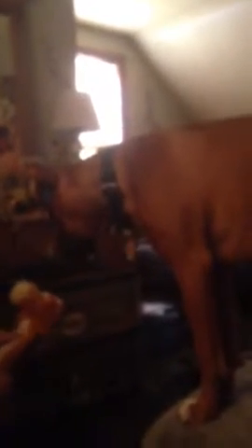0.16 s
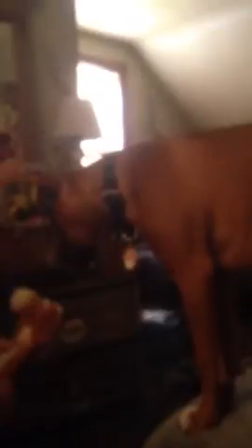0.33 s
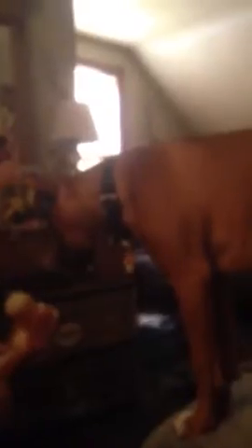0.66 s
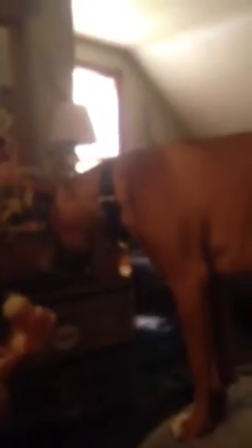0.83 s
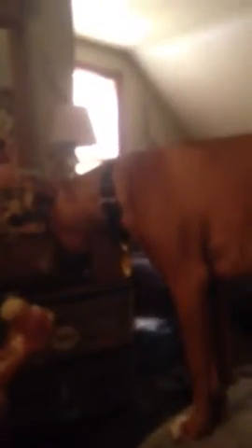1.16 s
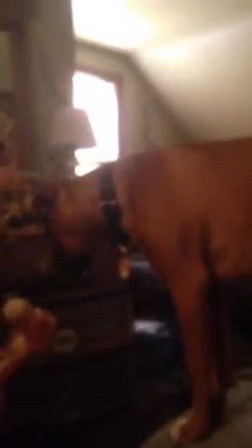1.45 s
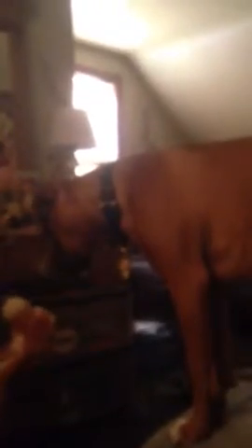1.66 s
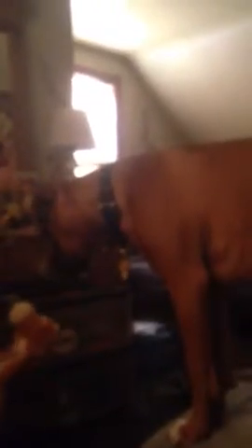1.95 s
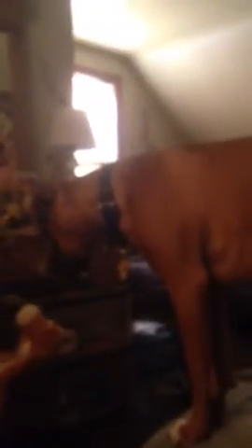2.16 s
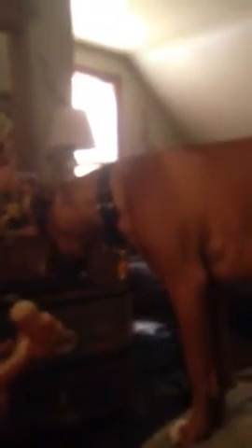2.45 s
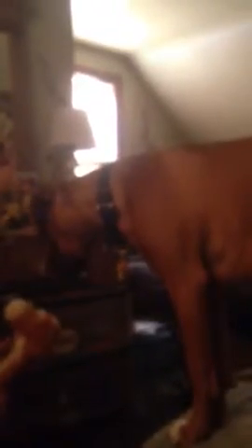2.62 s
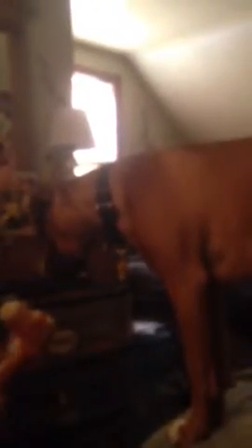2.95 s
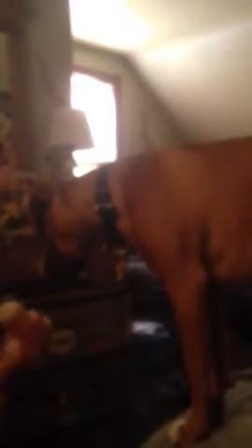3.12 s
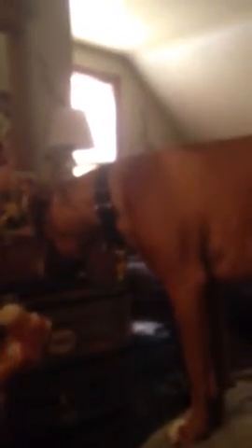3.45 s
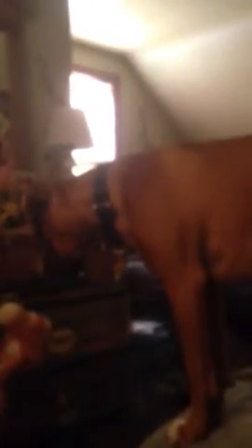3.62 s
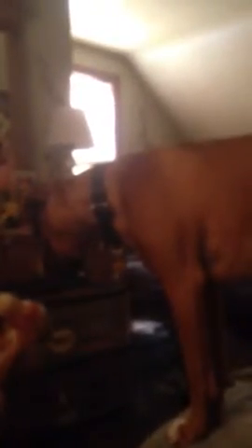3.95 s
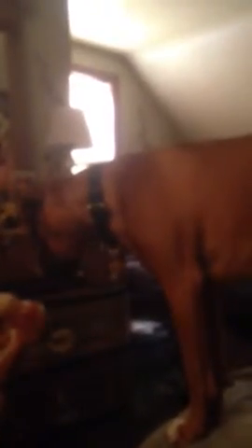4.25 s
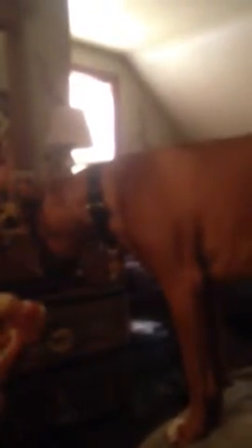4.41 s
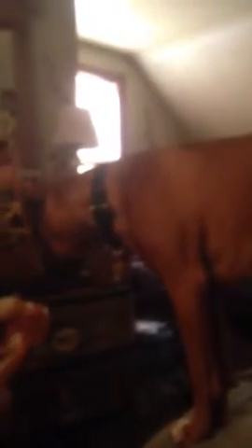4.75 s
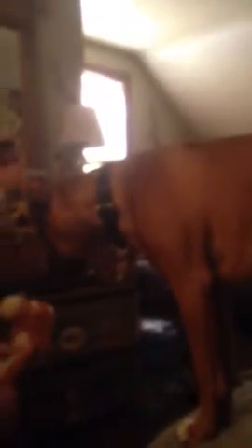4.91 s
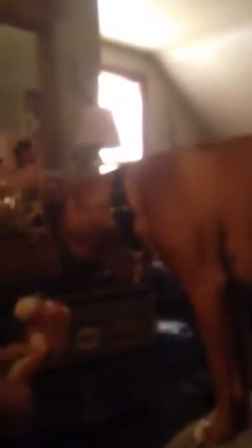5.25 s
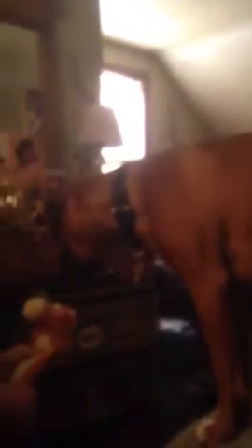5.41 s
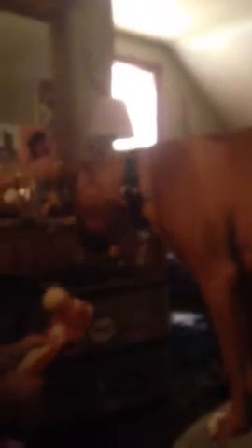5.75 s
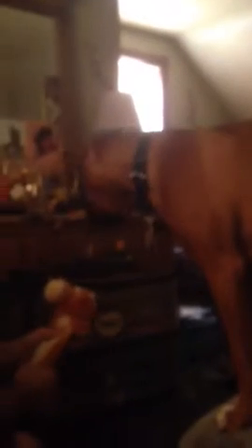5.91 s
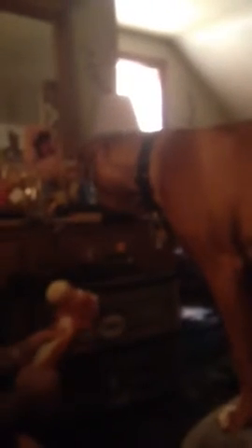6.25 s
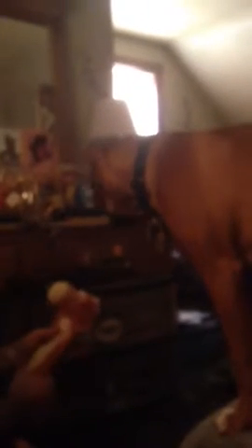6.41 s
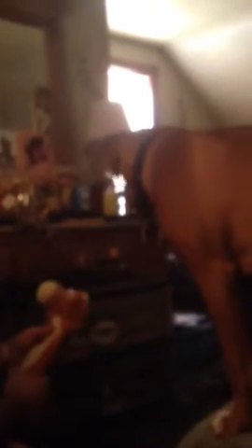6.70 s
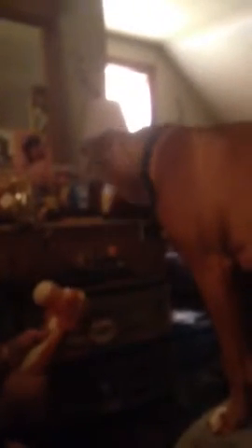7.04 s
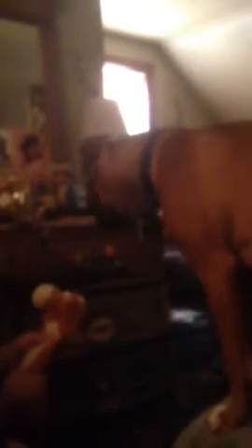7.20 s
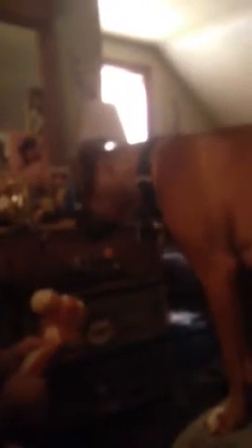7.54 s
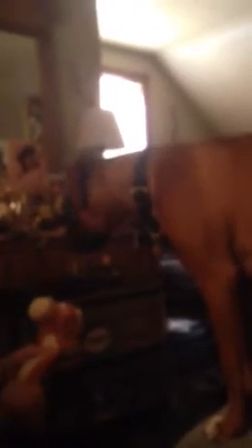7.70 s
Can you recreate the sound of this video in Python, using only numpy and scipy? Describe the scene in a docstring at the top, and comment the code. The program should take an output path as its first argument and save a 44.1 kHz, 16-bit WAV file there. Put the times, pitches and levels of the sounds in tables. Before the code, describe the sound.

A rubber squeaky toy is worked by hand close to the microphone in a small furnished room with near reflections and a short tail. At about 0.1 s a raspy yelp leaps into a piercing squeal that holds high, then slides down and dies by 0.9. From 1.0 to 2.3 come fussy little squeezes: short squawks, soft chirps, cracking whistles and wheezy refills. A thin, slightly sagging whine with a low nasal buzz lasts until about 2.9. A second, shorter squeal arches at 3.1 to 3.6, with a refill whine and buzz from 3.8 to 4.5. A third squeal runs 4.8 to 5.5, followed by buzzing, chirps and quick squawks until 6.4, then a longer whine to 6.95. The fourth squeal rises at 7.2 and slides away by 7.8. Low appliance hum and faint hush fill the gaps, swelling slightly.

```python
"""A small furnished room: a rubber toy with three reeds is squeezed and let go close to the microphone.
Each reed is a pulse train of harmonics coloured by its pipe: the high one squeals in arches, the middle
one drones near 1 kHz as the toy refills, the low one buzzes and leaps through registers when pressed.
Near echoes and a short tail make the room; an appliance hums in a hush; gain control lifts the pauses."""
import sys
import numpy as np
from scipy import signal
from scipy.fft import rfft, irfft
from scipy.io import wavfile
from scipy.ndimage import uniform_filter1d

SR = 44100
rng = np.random.default_rng(int(sys.argv[2]) if len(sys.argv) > 2 else 0)


def store_pcm(level_fs):
    """Save levels as 16-bit WAV."""
    pcm = np.round(np.clip(level_fs, -1, 1) * 32767).astype(np.int16)
    wavfile.write(sys.argv[1], SR, np.atleast_2d(pcm).T)


N = 347067

GENTLE_PRESSES = [(1.55, 1.574, 1.615, 1.66, 1296, -16.5), (1.785, 1.816, 1.842, 1.897, 1160, -19),
                  (2.05, None, 2.088, 2.135, 557.6, -24)]
# colour of the low reed's pipe, air drawn in: freq_hz, gain_db
LOW_INWARD_PIPE = [(450, -24), (1000, -18), (2000, -12.5), (2500, -15), (3050, -11.5), (4050, -20),
                   (5000, 1.5), (6600, -3.5), (7300, -10.5), (8300, -22.5), (11000, -17), (15000, -24.5)]
# low register of the low reed, time of a register leap, level at the start of a press
LOW_ENTRY_HZ, LOW_EXIT_HZ, LEAP_S, PRESS_RISE_DB = 464.3, 730.6, .006, -10.5


def gain_of(db):
    """Decibels to an amplitude factor."""
    return 10 ** (np.asarray(db) / 20)


def evened(x):
    """Scales to rms 1."""
    return x / np.sqrt(np.mean(x ** 2) + 1e-20)


def read(points, hz):
    """Interpolates a table on a log-frequency axis."""
    f, value = np.transpose(points)
    return np.interp(np.log(hz + 1), np.log(f + 1), value)


def wobble(count, seconds):
    """Noise of rms 1, smoothed twice by a moving mean of this length."""
    size = max(round(seconds * SR), 2)
    once = uniform_filter1d(rng.standard_normal(count), size=size)
    return evened(uniform_filter1d(once, size=size))


def reed(notes, pipe, waver, dull_db, smooth_samples=120):
    """Pulse trains as sums of harmonics, each weighted and delayed by the pipe; note rows: s, Hz, dB."""
    top_hz = SR / 2.6
    grid_hz = np.fft.rfftfreq(1024, 1 / SR)
    log_gain = np.log(gain_of(read(pipe, grid_hz)))
    mirrored = np.r_[log_gain, log_gain[-2:0:-1]]
    phase_rad = -signal.hilbert(mirrored).imag[:len(grid_hz)]  # minimum phase: pipe rings after each pulse
    out = np.zeros(N)
    for rows in notes:
        s, hz, level_db = np.transpose(rows)
        at = np.arange(round(s[0] * SR), round(s[-1] * SR))
        hz, level_db = np.interp(at / SR, s, hz), np.interp(at / SR, s, level_db)
        hz = uniform_filter1d(hz, size=smooth_samples, mode="nearest")  # the reed rounds off changes
        glide_per_s = np.minimum(abs(np.gradient(np.log(hz))) * SR, 30)
        jerks = .0012 * glide_per_s * wobble(len(at), .004)  # slides are uneven
        hz = hz * (1 + waver * wobble(len(at), 0.0021) + jerks)

        k = np.arange(1, top_hz / hz.min())[:, None]
        harmonic_hz = k * hz
        # a fast reed hardly shuts: overtones lose dull_db an octave at 3 kHz pitch, less when lower
        fading_db = dull_db * np.log2(k) * hz / 3000
        weight = gain_of(read(pipe, harmonic_hz) - fading_db) * (harmonic_hz < top_hz)
        phase = 2 * np.pi * k * np.cumsum(hz) / SR + np.interp(harmonic_hz, grid_hz, phase_rad)
        tone = (weight * np.cos(phase)).sum(0)
        tone /= np.sqrt((weight ** 2).sum(0) / 2)
        ramp = np.minimum(at - at[0], (at[-1] - at) / 4) / (.001 * SR)  # 1 ms in, 4 ms out
        out[at] += gain_of(level_db) * np.minimum(1, ramp) * tone
    return out


def arch(t, crest_s, start_hz, crest_hz, end_hz):
    """Pitch that bends up to a crest and eases down again."""
    up = np.clip((crest_s - t) / (crest_s - t[0]), 0, 1)
    down = np.clip((t - crest_s) / (t[-1] - crest_s), 0, 1)
    return crest_hz - (crest_hz - start_hz) * up ** 2 - (crest_hz - end_hz) * down ** 1.6


def droop(t, seconds):
    """Pitch lost, in Hz, as the air gives out at the end of a note."""
    droop_hz_per_s = 2100
    return droop_hz_per_s * seconds * np.maximum(1 - (t[-1] - t) / seconds, 0) ** 2


def squeal(rows, tail):
    """The arch of the hand, then a tail that drops fast, sags slowly, droops and fades ever faster."""
    slip_s, droop_s, bend = .005, .03, 1.4
    from_hz, knee_hz, rest_hz = 1830, 1222, 1027
    tail_db, fade_db = -18.5, -22
    knee_s, end_s = tail
    t = np.linspace(0, end_s, num=60)
    hz = np.interp(t, [knee_s, end_s], [knee_hz, rest_hz]) - droop(t, droop_s)
    hz = hz + (from_hz - knee_hz) * np.maximum(1 - t / knee_s, 0) ** bend
    level_db = tail_db + fade_db * (t / end_s) ** 1.5
    return np.r_[rows, np.c_[rows[-1][0] + slip_s + t, hz, level_db]]


def squeals():
    """High reed: pitch follows the pressure of the hand until it slips into its dying tail."""
    # one list a squeal: time_s, pitch_hz, level_db
    hand_arches = [
        [(0.115, 823, -19), (0.14, 2500, -16), (0.18, 4470, -20), (0.23, 4830, -15), (0.26, 4826, -40),
         (0.3, 4828, -19.5), (0.343, 4750, -30), (0.348, 4730, -16), (0.39, 4583, -20), (0.43, 4502, -18.5),
         (0.52, 4445, -25.5), (0.563, 3940, -24), (0.566, 3660, -22), (0.603, 3420, -21), (0.64, 3287, -21),
         (0.7, 2623, -19), (0.745, 2054, -20)],
        [(3.09, 1145, -21), (3.1, 1560, -16.5), (3.12, 2410, -15.5), (3.163, 3500, -18), (3.187, 3780, -20.5),
         (3.192, 4140, -23.5), (3.225, 4460, -26), (3.265, 4040, -25), (3.27, 3700, -21), (3.3, 3154, -20),
         (3.35, 2482, -18.5), (3.404, 2335, -21), (3.408, 2191, -17), (3.445, 2116, -22)],
        [(4.83, 901, -26), (4.87, 1407, -18), (4.898, 1940, -15.5), (4.902, 2140, -16), (4.925, 2790, -18.5),
         (4.95, 3235, -21), (5.0, 3750, -23), (5.012, 4070, -21.5), (5.025, 3627, -23), (5.13, 3510, -23),
         (5.16, 3410, -23.5), (5.2, 3040, -21), (5.23, 2550, -20.5), (5.27, 2275, -19.5), (5.292, 1920, -21)],
        [(7.195, 826, -29), (7.24, 1459, -16.5), (7.26, 1950, -17.5), (7.29, 3280, -18), (7.305, 3560, -19),
         (7.335, 3810, -25), (7.34, 4100, -25), (7.365, 4195, -22), (7.4, 4236, -24), (7.45, 4010, -24.5),
         (7.455, 3675, -25), (7.5, 3430, -20.5), (7.53, 3160, -20.5), (7.575, 2460, -19.5),
         (7.608, 2090, -18.5)],
    ]
    # dying tail of each squeal: level_off_s, end_s (both from the tail's start)
    dying_tails = [(.1, .18), (.078, 0.2), (.075, 0.18), (.085, 0.2)]
    # colour of the pipe: freq_hz, gain_db
    squeal_pipe = [(800, -14), (1500, -10), (2500, -9.5), (4000, -3), (5500, 2.5), (7000, 0.5), (9000, -1),
                   (10800, -13.5), (12500, -4.5), (15000, -14.5)]
    return reed(map(squeal, hand_arches, dying_tails), squeal_pipe, waver=0.0016, dull_db=5.5)


def chirp(start_s, crest_s, end_s, crest_hz, level_db):
    """One arch with a soft start that fades at its end."""
    start_hz, end_hz, fade_db = 1098, 1020, -10
    t = np.linspace(start_s, end_s, num=40)
    fade = ((t - start_s) / (end_s - start_s)) ** 6 + 0.31 * np.exp((start_s - t) / 0.0069)
    return np.c_[t, arch(t, crest_s, start_hz, crest_hz, end_hz), level_db + fade_db * fade]


def chirps():
    """High reed: short pitch arches as the grip shifts."""
    # start_s, crest_s, end_s, crest_hz, level_db
    chirp_rows = [(1.204, 1.237, 1.285, 1160, -24.5), (1.482, 1.516, 1.57, 1212, -24.5),
                  (2.084, 2.137, 2.21, 1514, -21.5), (5.857, 5.905, 5.99, 1515, -21),
                  (6.172, 6.206, 6.285, 1494, -20.5)]
    # colour of the pipe: freq_hz, gain_db
    chirp_pipe = [(1000, -12), (2400, -11), (3500, -7.5), (4600, -4), (6000, -2.5), (8000, -3),
                  (10500, -12.5), (15000, -15.5)]
    notes = [chirp(*row) for row in chirp_rows]
    return reed(notes, chirp_pipe, waver=.001, dull_db=1.5, smooth_samples=500)


def drone(start_s, crest_s, end_s, crest_hz, sag_hz_per_s, droop_s, crest_db):
    """Rises to a crest, settles, sags as the toy fills and droops at the end; level follows pitch."""
    start_hz, settle_hz, settle_s, db_per_hz = 979, 20, .1, 0.09
    round_s = .02  # the sag sets in gradually
    t = np.arange(start_s, end_s, .002)
    after = np.maximum(t - crest_s, 0)
    hz = arch(t, crest_s, start_hz, crest_hz, crest_hz)
    hz = hz - settle_hz * (1 - np.exp(-(after / settle_s) ** 2))
    hz = hz - sag_hz_per_s * (after - round_s * (1 - np.exp(-after / round_s)))
    hz = hz - droop(t, droop_s)
    return np.c_[t, hz, crest_db + db_per_hz * (hz - crest_hz)]


def drones():
    """Middle reed, driven by air drawn back in."""
    # start_s, crest_s, end_s, crest_hz, sag_hz_per_s, droop_s, crest_db
    drone_rows = [(0.962, 1.032, 1.19, 1088, 512, 0.041, -26),
                  (1.321, 1.373, 1.455, 1024, 447, 0.024, -28.5),
                  (1.604, 1.638, 1.785, 1008, 420, 0.047, -31),
                  (1.937, 1.973, 2.052, 1002, 200, 0.033, -33), (2.248, 2.297, 2.89, 1009, 150.3, .03, -31),
                  (3.782, 3.871, 4.54, 1033, 171, .03, -28), (5.545, 5.626, 5.845, 1064, 327, 0.035, -26.5),
                  (6.016, 6.05, 6.147, 1029, 350, .03, -30.5),
                  (6.321, 6.359, 6.95, 1029, 159.4, 0.039, -30)]
    # colour of the pipe: freq_hz, gain_db
    drone_pipe = [(800, -11), (1900, -5), (3000, -13), (4000, -10), (6500, -17), (7300, -4), (8300, -1.5),
                  (9300, -1.5), (10200, -6.5), (11200, -5), (12300, -11), (15000, -20.5)]
    notes = [drone(*row) for row in drone_rows]
    return reed(notes, drone_pipe, waver=0.00037, dull_db=0.5, smooth_samples=300)


def hard_press(start_s, leap_s, second_leap_s, end_s, top_hz, level_db):
    """Low, middle and high register in turn; level dips in each leap; a long top steps down a little."""
    low_halfway_hz = 560  # the low climb starts slowly
    middle_entry_hz, middle_exit_hz, high_entry_hz = 1099, 1352, 2405
    dip_db, top_db, fade_db = -3, -6.5, -12
    climb_s, hold_s, step_hz = .013, .032, 211
    high_s = second_leap_s + LEAP_S
    top_s = min(high_s + climb_s, end_s - .001)
    step_s = top_s + hold_s
    rows = [(start_s, LOW_ENTRY_HZ, level_db + PRESS_RISE_DB),
            ((start_s + leap_s) / 2, low_halfway_hz, level_db + dip_db),
            (leap_s, LOW_EXIT_HZ, level_db),
            (leap_s + LEAP_S, middle_entry_hz, level_db + dip_db),
            (second_leap_s, middle_exit_hz, level_db),
            (high_s, high_entry_hz, level_db + dip_db / 2),
            (top_s, top_hz, level_db + top_db)]
    if end_s < step_s + LEAP_S:
        return rows + [(end_s, top_hz, level_db + fade_db)]
    return rows + [(step_s, top_hz - step_hz / 4, level_db + fade_db),
                   (step_s + LEAP_S, top_hz - step_hz, level_db + top_db),
                   (end_s, top_hz - step_hz, level_db + fade_db)]


def gentle_press(start_s, leap_s, crest_s, end_s, top_hz, level_db):
    """A climb through the low register, if it leaps, and one flat-topped arch."""
    rise_share, fall_share, flatness = .17, .24, 2.2  # shares of pitch below the top at start and end
    t = np.linspace(leap_s + LEAP_S if leap_s else start_s, end_s, num=30)
    rising = t < crest_s
    away = np.where(rising, (crest_s - t) / (crest_s - t[0]), (t - crest_s) / (end_s - crest_s))
    hz = top_hz * (1 - np.where(rising, rise_share, fall_share) * away ** flatness)
    rise_db = 0 if leap_s else PRESS_RISE_DB * rising * away
    bend = np.c_[t, hz, level_db + rise_db + 0 * t]
    if not leap_s:
        return bend
    climb = [(start_s, LOW_ENTRY_HZ, level_db + PRESS_RISE_DB), (leap_s, LOW_EXIT_HZ, level_db)]
    return np.r_[climb, bend]


def presses():
    """Low reed pressed: climbs through a register and leaps to the next."""
    # start_s, leap_to_middle_s, leap_to_high_s, end_s, top_hz, level_db
    hard_rows = [(0.091, 0.109, 0.12, 0.14, 2960, -15.5), (1.321, 1.334, 1.361, 1.432, 2640, -15),
                 (3.068, 3.08, 3.095, 3.114, 3030, -15), (4.804, 4.828, 4.842, 4.868, 2750, -14),
                 (5.916, 5.93, 5.94, 5.97, 3024, -16.5), (6.296, 6.318, 6.339, 6.415, 2615, -15),
                 (7.159, 7.199, 7.213, 7.229, 2530, -13.5)]
    # colour of the pipe, air pushed out: freq_hz, gain_db
    outward_pipe = [(450, -24), (1200, -15), (2400, -7.5), (3700, -5.5), (5100, 1), (6300, -9.5),
                    (9000, -15.5), (15000, -15.5)]
    notes = [hard_press(*row) for row in hard_rows] + [gentle_press(*row) for row in GENTLE_PRESSES]
    return reed(notes, outward_pipe, waver=0.0058, dull_db=6)


def cracks():
    """Low reed falls through its registers: whistles cracking on drawn-in air, slips after gentle presses."""
    # whistles: start_s, crack_s, slowness (factor), whistle_hz, level_db
    whistle_rows = [(1.008, 1.034, 1.05, 3050, -26.5), (1.406, 1.442, 1.05, 2943, -28),
                    (3.818, 3.84, 1.07, 2960, -24), (5.541, 5.568, 1.25, 3020, -27.5),
                    (6.121, 6.146, 1.05, 2905, -28), (6.398, 6.42, 1.13, 2880, -27.5)]
    # path of a crack: delay_s (times slowness), pitch_hz, level_db (re whistle)
    crack_path = [(.003, 2347, 5.5), (.01, 1502, -2), (.016, 620, 7.5), (.03, 514.7, 4)]
    # path of a slip: delay_s (after the press), pitch_hz, level_db (re press)
    slip_path = [(0, 903, -12), (.01, 691, -4), (.04, 525, -10)]
    sag_hz, rise_db = 180, -7.5  # a whistle starts sharper and softer
    notes = []
    for start_s, crack_s, slowness, hz, db in whistle_rows:
        whistle = [(start_s, hz + sag_hz, db + rise_db), (crack_s, hz, db)]
        notes.append(whistle + [(crack_s + slowness * d, f, db + more_db) for d, f, more_db in crack_path])
    for _, leap_s, _, end_s, _, db in GENTLE_PRESSES:
        if leap_s:
            notes.append([(end_s + d, f, db + more_db) for d, f, more_db in slip_path])
    return reed(notes, LOW_INWARD_PIPE, waver=0.004, dull_db=9.5)


def buzz(rows, level_db):
    """More flow, higher and louder: level follows pitch."""
    base_hz, db_per_octave = 497.5, 29.5
    return [(s, hz, level_db + db_per_octave * np.log2(hz / base_hz)) for s, hz in rows]


def buzzes():
    """Low reed buzzing on air drawn in; pitch follows the flow."""
    # one list a buzz: time_s, pitch_hz
    buzz_rows = [
        [(1.08, 502), (1.12, 525), (1.145, 505.7), (1.2, 515), (1.23, 492.7), (1.31, 490)],
        [(1.475, 480), (1.51, 548), (1.55, 508)],
        [(1.7, 538), (1.745, 569), (1.765, 544), (1.78, 454)],
        [(1.96, 519), (2.0, 609), (2.04, 468)],
        [(2.17, 519), (2.22, 603.6), (2.25, 565), (2.3, 527), (2.325, 499), (2.35, 502), (2.41, 516.5),
         (2.5, 507), (2.6, 506), (2.64, 512.6), (2.68, 497.8), (2.84, 501.2), (2.87, 524.6), (2.92, 455)],
        [(3.89, 490), (3.95, 523.3), (4.05, 534.7), (4.12, 508), (4.18, 495.6), (4.22, 504.5), (4.26, 457)],
        [(5.625, 483.5), (5.67, 530.6), (5.705, 511.3), (5.75, 505), (5.825, 516), (5.85, 504), (5.88, 470)],
        [(6.18, 467), (6.24, 529), (6.29, 464)],
        [(6.47, 476), (6.5, 540), (6.56, 533), (6.6, 497.5), (6.7, 495.5), (6.78, 500.5), (6.82, 467)],
    ]
    # one value a buzz: level_db (at base_hz)
    buzz_levels = [-32, -32, -32.5, -34, -33.5, -32.5, -31.5, -31, -33]
    notes = map(buzz, buzz_rows, buzz_levels)
    return reed(notes, LOW_INWARD_PIPE, waver=0.00064, dull_db=10.0, smooth_samples=800)


def room(x, wet_db):
    """A few near reflections, then sparse taps of random sign, each band dying at its own speed."""
    # decay: freq_hz, t60_s
    decay_times = [(500, 0.26), (1500, 0.17), (4000, 0.15), (8000, 0.16), (15000, 0.18)]
    # near surfaces: delay_s, level_db
    near_echoes = [(.0012, -11.5), (.0031, -13.5), (.0057, -8), (.0094, -23), (0.0149, -16.5),
                   (.021, -14.5)]
    taps = np.zeros(SR // 2)
    at = np.arange(200, SR // 2 - 20, 20)
    taps[at + rng.integers(0, 20, len(at))] = rng.choice([-1., 1.], len(at))
    hz, t, bands = signal.stft(taps, SR, nperseg=256)
    decay_db = -60 * t / read(decay_times, hz)[:, None]
    tail = signal.istft(bands * gain_of(decay_db), SR, nperseg=256)[1]
    tail = gain_of(wet_db) * tail / np.linalg.norm(tail)
    signs = rng.choice([-1., 1.], len(near_echoes))
    for (delay_s, db), sign in zip(near_echoes, signs):
        tail[round(delay_s * SR)] += sign * gain_of(db)
    return signal.fftconvolve(x, tail)[:N]


def background():
    """Appliance hum as sines wavering in level and phase, over the room's hush of shaped noise."""
    # hum lines: freq_hz, level_db (rms)
    hum_lines = [(59.2, -56), (84, -68.5), (120, -82.5), (177.6, -56.5), (404, -76)]
    # spectrum of the hush: freq_hz, density_db (relative)
    hush_spectrum = [(26, -46), (45, -15.5), (190, 0), (296, -14), (416, -0.5), (519, -13.5), (805, -11.5),
                     (932, -18), (2540, -25), (2940, -30), (4140, -32.5), (15500, -47)]
    hush_db = -53.5
    t = np.arange(N) / SR
    hum = np.zeros(N)
    for hz, db in hum_lines:
        amplitude = np.sqrt(2) * gain_of(db + 1.5 * wobble(N, 0.038))
        hum += amplitude * np.sin(2 * np.pi * (hz * t + 0.13 * wobble(N, 0.084)))
    shape = gain_of(read(hush_spectrum, np.fft.rfftfreq(N, 1 / SR)))
    hush = irfft(rfft(rng.standard_normal(N)) * shape, N)
    return hum + gain_of(hush_db) * evened(hush)


def scene():
    """The reeds, their room and the background, alike on both channels."""
    toy = squeals() + chirps() + drones() + presses() + cracks() + buzzes()
    direct = gain_of(1.0) * toy
    return np.tile(direct + room(toy, wet_db=-6) + background(), (2, 1))


def record(dry):
    """Gain control creeps up in pauses and drops at once on a squeak; then soft clipping and a band limit."""
    edge_hz, release_db_per_s, floor_db = 15300, 60., -48
    power = uniform_filter1d((dry ** 2).mean(0), size=400)
    power_db = 10 * np.log10(abs(power) + 1e-12)
    fall_db = np.arange(N) * release_db_per_s / SR
    held_db = np.maximum(np.maximum.accumulate(power_db + fall_db) - fall_db, floor_db)
    lifted = dry * gain_of(-.25 * uniform_filter1d(held_db + 15.5, size=100))
    rounded = 0.93 * np.tanh(lifted / 0.97)  # the input stage rounds off the tallest pulses
    lowpass = signal.firwin(511, edge_hz, window=("kaiser", 9), fs=SR)
    return signal.oaconvolve(rounded, lowpass[None], "same")


dry = scene()
out = record(dry)
store_pcm(out)
```